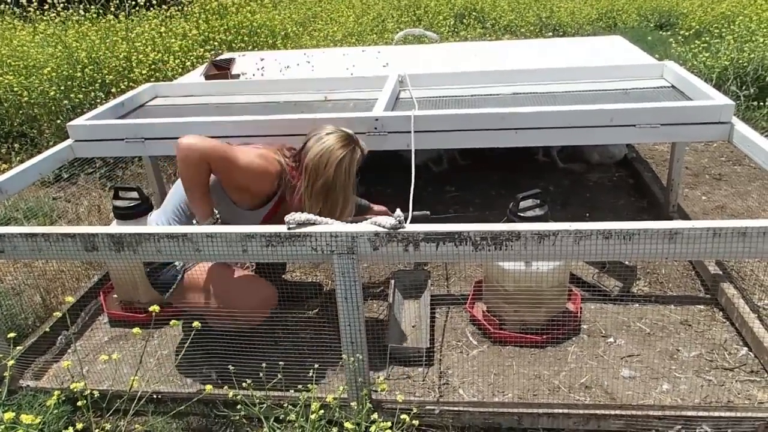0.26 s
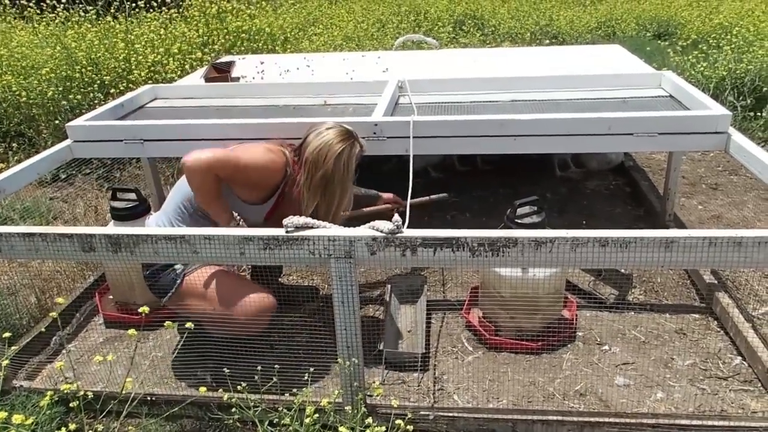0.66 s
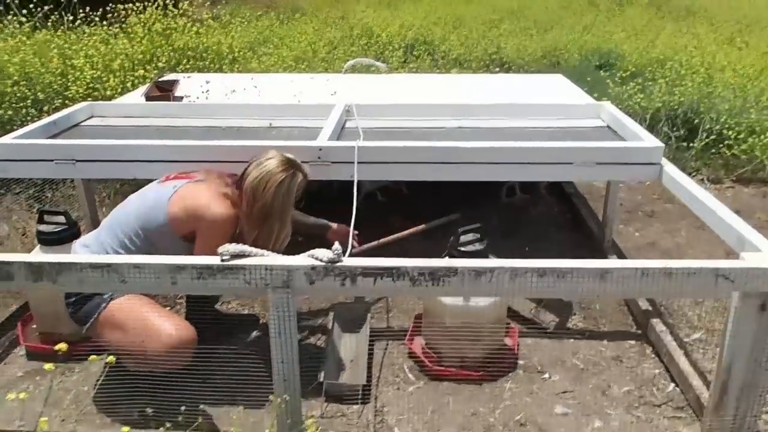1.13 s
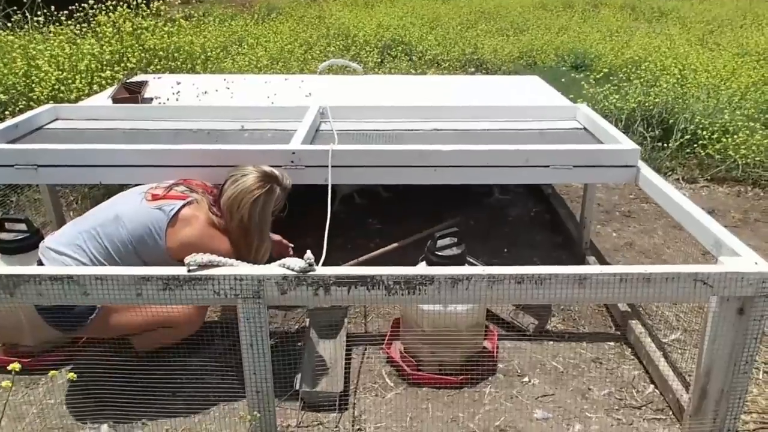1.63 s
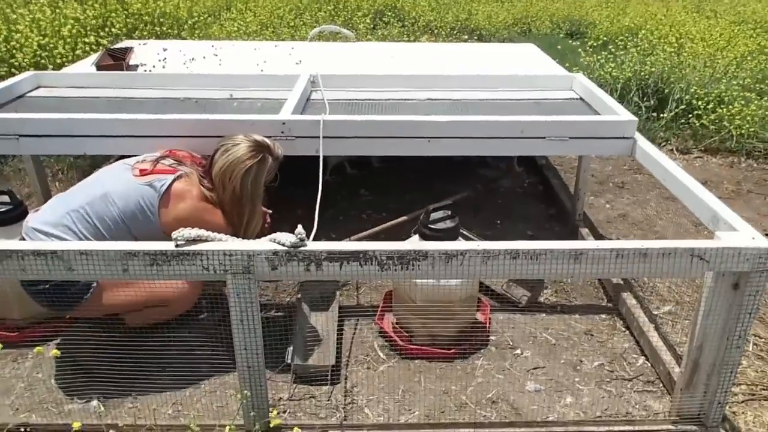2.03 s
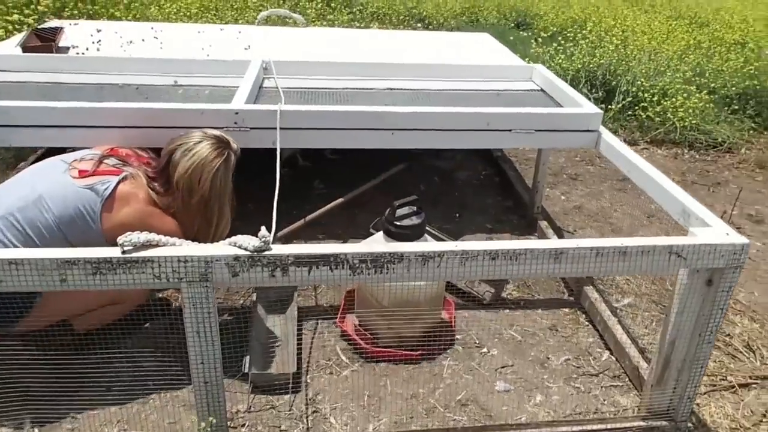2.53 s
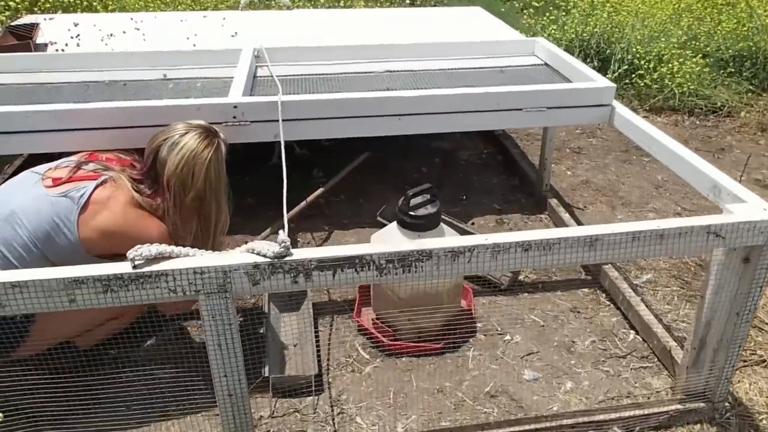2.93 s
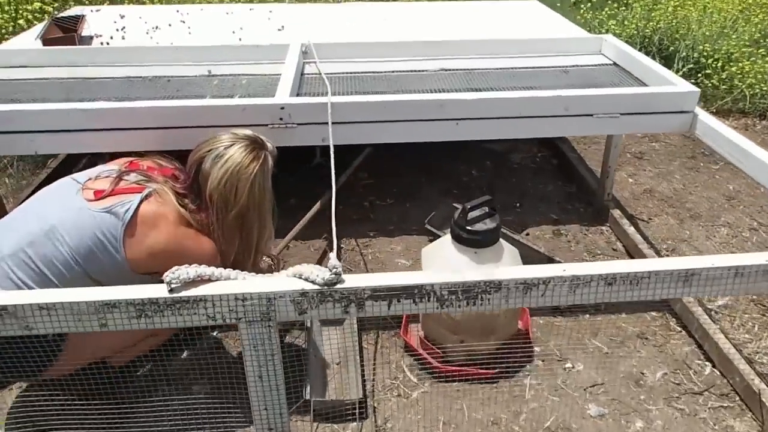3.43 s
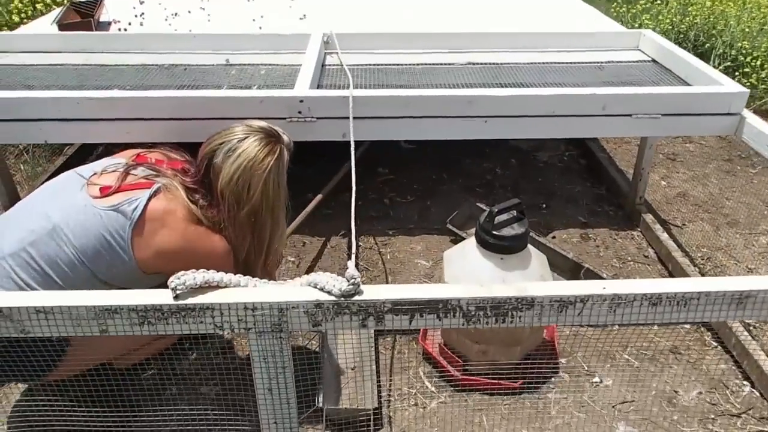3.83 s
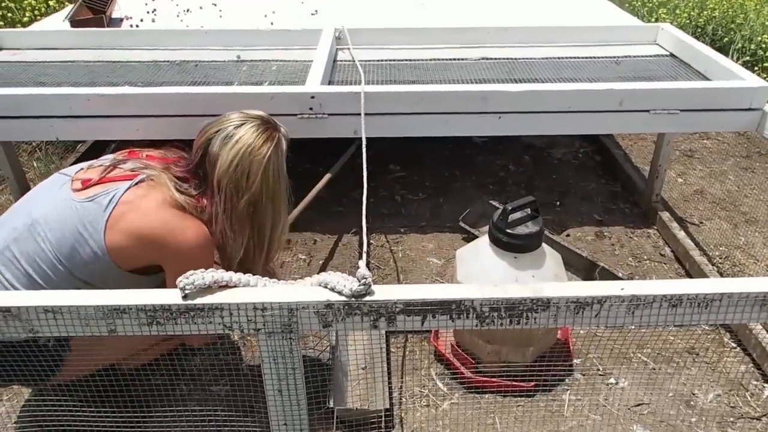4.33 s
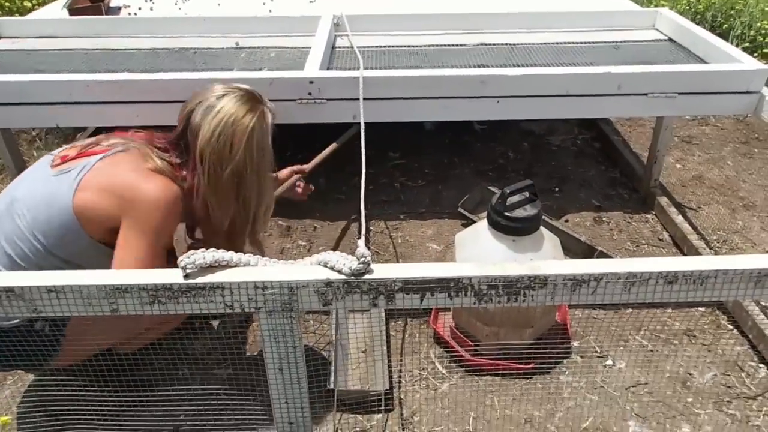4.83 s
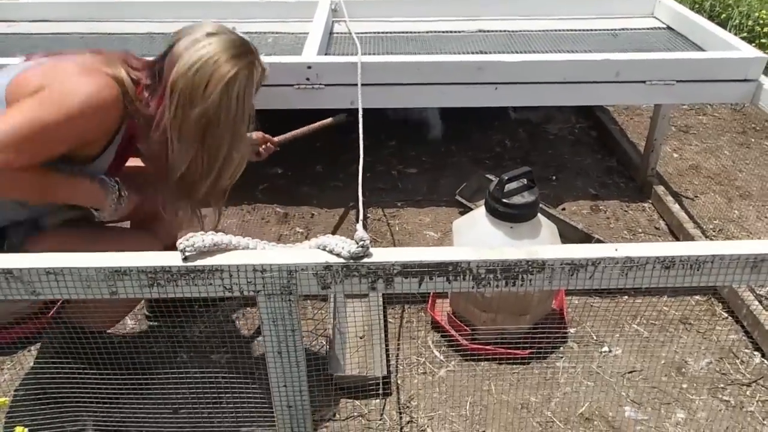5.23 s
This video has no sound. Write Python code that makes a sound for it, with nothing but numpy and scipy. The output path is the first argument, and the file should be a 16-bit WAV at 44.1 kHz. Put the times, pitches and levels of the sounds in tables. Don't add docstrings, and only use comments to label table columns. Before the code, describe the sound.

Young chickens peep and cluck faintly under a wire pen roof amid buffeting wind, then scuffle, slap the wood and squawk sharply near the end.

```python
import sys
import numpy as np
from scipy import signal
from scipy.fft import rfft, irfft, next_fast_len
from scipy.io import wavfile
from scipy.ndimage import map_coordinates

SR = 44100
rng = np.random.default_rng(int(sys.argv[2]) if len(sys.argv) > 2 else 0)


def gain_from_decibels(decibels):
    exponent = np.asarray(decibels, float) / 20
    return 10 ** exponent


def digitize_waveform(pressure):
    field = np.atleast_2d(pressure).T
    bounded = np.clip(field, -1, 1)
    quanta = np.round(bounded * 32767).astype(np.int16)
    wavfile.write(sys.argv[1], SR, quanta)


N = 241527

# time in seconds, level in dB.
WIND_STRENGTH = [(0.0, -31), (0.14, -31), (0.46, -40), (0.65, -31.5), (0.76, -34), (0.99, -37.5),
                 (1.37, -31.5), (1.93, -35), (2.18, -31), (2.3, -33.5), (3.08, -31.5), (3.46, -38),
                 (3.82, -38), (4.56, -38.5), (4.86, -29.5), (5.03, -37), (5.22, -38), (5.47, -30.5)]
# centre in seconds, peak in dB, frequency in Hz.
PUFFS_LEFT = [(0.055, -13, 152), (0.084, -6, 139), (0.216, -9.5, 140), (0.261, -12.5, 160),
              (0.682, -18, 130), (0.709, -10, 125), (1.21, -6, 142), (1.487, -11, 129), (1.514, -11, 168),
              (1.545, -15.5, 160), (1.654, -12, 151), (1.934, -14, 104), (2.012, -9.5, 163),
              (2.506, -11, 99), (2.923, -15, 119), (2.96, -12, 140), (3.057, -10, 137), (4.818, -13, 169),
              (4.862, -11, 150), (5.44, -14, 150)]
PUFFS_RIGHT = [(0.034, -12.5, 122), (0.088, -11, 139), (0.224, -5, 236), (0.251, -5.5, 160),
               (0.355, -11, 136), (0.691, -13, 106), (1.138, -15.5, 119), (1.192, -11.5, 130),
               (1.229, -13.5, 186), (1.376, -14, 111), (1.487, -8.5, 127), (1.525, -11, 154),
               (1.657, -5.5, 124), (2.01, -11.5, 142), (2.256, -10, 138), (3.859, -9.5, 126),
               (4.767, -9, 146), (4.84, -8, 151), (4.858, -11, 132)]
# frequency in Hz, level in dB.
RUMBLE_SPECTRUM = [(12, -43), (20, -17), (59, 2.5), (130, -1.5), (170, -10.5), (290, -120)]
FLUTTER_SPECTRUM = [(70, -51), (120, 2.5), (190, 2), (300, -11), (500, -22.5), (900, -39)]
# time in seconds, level in dB.
UNREST = [(0.0, -38.5), (0.17, -41.5), (0.65, -43.5), (1.86, -43), (2.39, -35.5), (2.56, -29),
          (2.71, -37.5), (2.85, -34.5), (3.15, -37), (3.41, -39.5), (4.16, -41), (4.46, -37.5), (5.18, -38),
          (5.32, -35), (5.47, -36)]
# start in seconds, length in seconds, level in dB.
SWISHES = [
    (2.83, 0.35, -42),
    (5.35, 0.22, -40),
]
# frequency in Hz, level in dB.
FLOCK_SPECTRUM = [(200, -40), (350, 4.5), (800, -0.5), (1100, -0.5), (1700, -3.5), (2150, -1.5), (3000, -4),
                  (4200, -12), (6000, -27)]
LITTER_SPECTRUM = [(2500, -21.5), (3800, 1.5), (6000, -2.5), (8000, -6.5), (16000, -39)]
AIR_SPECTRUM = [(5000, -12), (7500, 0.5), (15000, -1), (17000, -25)]
# start in seconds, length in seconds, litter level in dB, thump level in dB.
KICKS = [(0.054, 0.04, -37, -30.5), (0.286, 0.034, -32.5, -39), (1.343, 0.047, -43, -38.5),
         (2.333, 0.062, -34, -35), (2.405, 0.048, -23, -30), (2.36, .01, -30, -45),
         (2.466, 0.04, -28, -33.5), (2.498, .016, -28, -36), (2.585, .025, -28, -36),
         (2.655, 0.031, -23, -34), (2.692, 0.041, -18, -26), (2.737, 0.047, -30.5, -30.5),
         (3.857, 0.023, -25, -38), (4.393, .022, -29, -35), (4.497, 0.013, -37, -30.5),
         (4.764, 0.043, -28, -45), (5.075, 0.095, -26.5, -37), (5.165, .025, -32, -40),
         (5.186, .016, -28, -27), (5.2, 0.024, -22.5, -26.5), (5.227, 0.031, -29, -41)]
BEATS = [(2.901, 0.03, -28, -50), (2.959, 0.037, -24.5, -38), (3.002, 0.054, -31.5, -36),
         (3.619, 0.099, -32, -37.5), (4.29, 0.016, -32, -29), (4.515, 0.029, -34, -41),
         (4.664, 0.023, -28.5, -38), (4.835, 0.056, -34, -36), (4.895, 0.06, -31, -29),
         (4.948, 0.039, -33, -34), (5.305, 0.013, -29, -31), (5.314, 0.019, -18.5, -22.5),
         (5.374, 0.045, -24, -34), (5.429, 0.026, -27, -39)]
# start in seconds, peak in dB, knock relative to the peak in dB.
TICKS = [(0.382, -30, 3), (0.4658, -33, -1), (0.5185, -23, -16), (0.933, -21, -2.5), (1.0412, -21.5, -4),
         (1.1435, -26, -17), (2.1507, -16, -15), (2.614, -15, -20), (4.3344, -24, -10),
         (4.5516, -18.5, -11), (5.2027, -9, -14), (5.2094, -10, -13), (2.4161, -18, -15),
         (2.6969, -16, -20), (2.9683, -19, -12), (4.396, -25, -10), (4.667, -27, -8), (5.2396, -21, -15),
         (5.316, -12, -11), (5.32, -10, -12), (5.3778, -17, -11), (5.3833, -17, -15), (5.4362, -19, -15),
         (5.2574, -21, -13), (5.4563, -8, -23)]
# frequency in Hz, level in dB.
THUMP_SPECTRUM = [(120, -6), (430, 6.5), (700, -1.5), (1200, 1), (3500, -4), (5000, -19)]
FEATHER_SPECTRUM = [(4500, -21), (6500, -5.5), (10000, -3), (16000, -5)]
# start in seconds, length in seconds, middle pitch in Hz, peak in dB.
CLUCKS = [(.079, 0.026, 1336, -32), (.233, 0.022, 1055, -34), (.301, 0.018, 978, -34),
          (1.275, 0.022, 1070, -40), (1.338, 0.011, 1110, -31), (1.358, .015, 1110, -25.5),
          (1.739, 0.027, 1236, -33), (2.055, 0.028, 1150, -36), (2.333, 0.035, 1314, -33.5),
          (2.341, 0.022, 1025, -28), (2.562, 0.0144, 1200, -21.5), (2.953, 0.022, 1027, -37),
          (2.983, 0.046, 1042, -37.5), (3.156, 0.013, 1162, -29), (3.653, 0.015, 1470, -27),
          (4.96, 0.013, 1216, -32), (2.965, 0.071, 432, -37), (4.903, 0.024, 723, -28.5)]
# start in seconds, length in seconds, middle pitch in Hz, peak in dB.
PEEPS = [(.136, .046, 2355, -43), (.277, 0.017, 3020, -39), (.33, 0.026, 2020, -39), (.4, 0.065, 2195, -41),
         (.464, 0.029, 3370, -44), (.684, 0.071, 2134, -39), (.845, 0.09, 2070, -38.5),
         (1.365, 0.12, 2200, -35.5), (1.553, .032, 2550, -43.5), (1.74, .055, 2170, -37),
         (1.953, 0.044, 3680, -45), (3.596, 0.03, 2215, -35.5), (4.379, 0.027, 3120, -35),
         (4.55, 0.034, 1675, -37.5), (4.878, 0.023, 2300, -33.5), (5.171, 0.027, 1637, -28)]
# start in seconds, length in seconds, middle pitch in Hz, peak in dB.
QUERIES = [
    (.186, 0.12, 2439, -37),
    (3.128, 0.051, 2710, -35.5),
]
# start in seconds, length in seconds, middle pitch in Hz, peak in dB.
CHIRPS = [(.285, 0.037, 2267, -38), (.758, .03, 3350, -39), (.91, 0.034, 1560, -47),
          (2.552, 0.0138, 1800, -36), (1.625, 0.083, 2800, -45), (1.922, 0.0254, 1152, -35),
          (2.07, 0.074, 2200, -41), (3.165, 0.053, 2400, -35), (3.287, .051, 1790, -41),
          (2.785, 0.069, 2350, -37), (3.433, 0.028, 1133, -28.5), (3.722, 0.036, 1500, -40),
          (3.888, 0.065, 2400, -37), (4.401, 0.058, 2370, -37), (4.723, 0.04, 1786, -38),
          (1.775, .07, 2080, -35.5), (1.025, .028, 1090, -30)]
# start in seconds, length in seconds, middle pitch in Hz, peak in dB.
SWOOPS = [
    (.319, 0.045, 1060, -39),
    (.696, .044, 1058, -41.5),
    (1.058, 0.089, 2260, -41),
    (2.267, 0.03, 1210, -36),
    (3.267, 0.022, 966, -31.5),
    (3.602, 0.0406, 1172, -37),
    (4.126, 0.022, 1100, -33),
    (4.222, 0.049, 1065, -29.5),
    (4.427, 0.048, 1106, -34),
]
# start in seconds, length in seconds, middle pitch in Hz, peak in dB.
HOOKS = [
    (.935, 0.062, 2460, -34.5),
    (1.158, 0.059, 2460, -31),
    (1.952, 0.05, 2480, -31.5),
    (3.221, 0.047, 2450, -30),
    (3.388, .055, 2750, -35),
]
# start in seconds, length in seconds, start pitch in
# Hz, end pitch in Hz, peak in dB.
CROWD_STRANDS = [(.495, .02, 2900, 2700, -43), (.575, 0.033, 2740, 2450, -43.5),
                 (.61, 0.034, 2650, 2440, -40), (.645, .025, 2160, 2000, -39), (.74, .025, 4500, 3700, -44),
                 (.775, .035, 2600, 2500, -42), (.87, 0.059, 3470, 2600, -46), (.96, 0.041, 3800, 3000, -41),
                 (1.0, .02, 2500, 2480, -45), (1.03, .015, 2300, 2100, -40), (1.04, 0.023, 3220, 3000, -41),
                 (1.06, 0.026, 2750, 2510, -42), (1.09, .05, 2450, 2390, -48), (1.25, .018, 2200, 1850, -44),
                 (1.343, .025, 2190, 2170, -38), (1.585, .03, 2250, 1945, -38),
                 (1.625, .02, 2150, 2050, -40), (1.7, .025, 3260, 3150, -44), (1.785, .02, 2430, 2410, -38),
                 (1.975, 0.044, 3700, 2400, -41), (2.13, 0.045, 3730, 3650, -43),
                 (2.17, 0.081, 2250, 1950, -44), (2.225, 0.037, 3700, 3150, -41),
                 (2.315, .03, 3350, 2900, -39), (2.34, .03, 2600, 2390, -38.5),
                 (2.56, .015, 2430, 2340, -32), (3.065, 0.043, 3060, 3000, -40),
                 (3.23, .02, 2150, 1850, -35), (3.3, 0.037, 2550, 2200, -43), (3.365, .03, 2010, 2900, -38),
                 (3.395, .025, 3600, 3400, -39), (3.45, .012, 2150, 2050, -38),
                 (3.95, 0.037, 2100, 2040, -41), (3.9, .08, 2200, 1500, -43),
                 (4.09, .045, 2660, 1250, -34.5), (4.2, 0.024, 2640, 2340, -33.5),
                 (4.228, .022, 2410, 2040, -32), (4.51, 0.062, 2990, 2550, -44.5),
                 (.545, 0.036, 1240, 1100, -43), (0.708, .025, 1800, 1600, -43),
               (0.774, 0.068, 1650, 1350, -43), (.845, .02, 1050, 880, -43),
               (0.974, 0.034, 2060, 1500, -42), (1.152, 0.016, 1330, 1020, -32.5),
               (1.163, .022, 874, 833, -32), (1.177, .035, 1495, 1300, -43), (1.36, .015, 1650, 1550, -43),
               (1.487, .018, 1050, 1000, -37), (1.629, .02, 1070, 1030, -40.5),
               (1.735, .02, 1850, 1800, -39), (1.75, 0.018, 1500, 1450, -39), (1.79, .012, 800, 600, -33.5),
               (1.825, .015, 1300, 1200, -38), (1.96, .022, 1520, 1480, -41),
               (2.251, .015, 1080, 1000, -39), (2.334, 0.013, 680, 620, -31), (2.489, .02, 1980, 1950, -36),
               (2.53, .012, 1150, 1050, -34), (3.366, .03, 1720, 1450, -41.5),
               (3.465, .025, 1250, 1320, -33), (3.493, 0.032, 1840, 1450, -38.5),
               (3.56, 0.017, 1660, 1610, -44), (3.647, .012, 1900, 1750, -38), (3.89, .05, 1500, 1000, -43),
               (4.21, .04, 1900, 1400, -41), (4.011, 0.019, 1260, 1050, -44)]
# start in seconds, length in seconds, middle pitch in Hz, peak in dB.
YELPS = [(4.774, .011, 1633, -17.5), (4.797, 0.012, 1643, -16), (5.078, 0.027, 3640, -29),
         (5.08, 0.016, 2050, -30), (5.139, 0.0069, 1570, -24), (5.375, 0.02, 2820, -25),
         (5.391, 0.014, 2090, -16), (5.402, 0.016, 1960, -16), (5.39, 0.014, 1740, -18),
         (5.402, 0.023, 1372, -21), (5.41, 0.019, 1657, -18.5)]
# start in seconds,
# length in seconds, start pitch in Hz, end pitch in Hz, peak in dB.
YELP_STRANDS = [
    (4.779, .012, 1800, 2350, -21),
    (4.789, .013, 2400, 2100, -20),
    (4.8, .012, 2250, 1900, -27),
    (4.953, .016, 2350, 1250, -30),
    (5.088, .008, 3100, 2000, -25),
    (5.104, .009, 2100, 2250, -23),
    (5.124, .007, 2200, 2300, -24),
    (5.1, .008, 3200, 3250, -28),
]
# frequency in Hz, time to fall by 60 dB in seconds.
ROOF_DECAY = [(500, 0.12), (3000, 0.12), (10000, 0.08)]
# time in seconds, level in dB.
STALK_DRAG = [
    (2.520, -58),
    (2.522, -10.5),
    (2.543, -12.5),
    (2.56, -11.5),
    (2.566, -57),
    (2.59, -70),
]
# frequency in Hz, level in dB.
STALK_SPECTRUM = [(3240, -31), (5500, -31), (6720, -16), (8450, -11.5), (10800, 3), (14000, -7),
                  (15100, -9), (16000, -33)]
# start in seconds, peak in dB, knock frequency in Hz.
SLAPS = [
    (5.2035, -6, 380),
    (5.2105, -3, 430),
    (5.3185, -12, 400),
    (4.2955, -22, 900),
    (4.4995, -24, 800),
]
# time in seconds, pitch in Hz, peak in dB, third partial in dB.
SQUAWK = [
    (5.093, 1750, -40, -20),
    (5.097, 1640, -9.5, -27),
    (5.102, 1630, -6.5, -18),
    (5.107, 1648, -8, -22),
    (5.1105, 1670, -17, -18),
    (5.114, 1660, -6, -26),
    (5.128, 1673, -8, -34),
    (5.135, 1600, -6.5, -34),
    (5.14, 1560, -32, -30),
]
# frequency in Hz, gain in dB.
HOUSING = [(3600, 1.5), (4030, -6), (4300, 5.5), (4830, 13.5), (5300, 7), (6000, 0.5), (7000, -5.5),
           (15800, -11), (16100, -60)]
# frequency in Hz, left minus right in dB.
BALANCE = [(300, -1.5), (2400, -1.5), (4400, -2), (8100, -3.5), (15000, -6.5)]

PEEP_GLIDE, CLUCK_GLIDE, CHIRP_GLIDE = (1.015, 0.93), (1.029, 0.92), (1.17, 0.83)
SWOOP_GLIDE, QUERY_GLIDE = (1.24, 0.937), (0.85, 1.01)
YELP_GLIDE, HOOK_GLIDE = (1.01, 0.94), (1.02, 0.8)


def unit(x):
    return x / np.sqrt(np.mean(x ** 2) + 1e-20)


def along(points, hz):
    f, v = np.transpose(points)
    return np.interp(np.log(hz + 1), np.log(f + 1), v)


def curves(rows):
    s, *columns = np.transpose(rows)
    return [np.interp(np.arange(N) / SR, s, column) for column in columns]


def wobble(rate):
    return map_coordinates(rng.standard_normal(int(N * rate / SR) + 4), [np.arange(N) * rate / SR])


def coloured(x, points):
    m = next_fast_len(N + 8192)
    gain = gain_from_decibels(along(points, np.fft.rfftfreq(m, 1 / SR)))
    return irfft(rfft(x, m) * gain, m)[..., :N]


def rush(spectrum, alike):
    mid, side = coloured(rng.standard_normal((2, N)), spectrum)
    turn = np.arccos(np.clip(alike, -1, 1)) / 2
    left = np.cos(turn) * mid + np.sin(turn) * side
    right = np.cos(turn) * mid - np.sin(turn) * side
    return unit(np.array([left, right]))


def add(track, s, sound):
    part = track[max(round(s * SR), 0):][:len(sound)]
    part += sound[:len(part)]


def humps(rows):
    track = np.zeros(N)
    for s, length, gain in rows:
        u = np.arange(round(3 * length * SR)) / (length * SR)
        rise = np.minimum(u / 0.12, 1)
        add(track, s, gain * rise * 1.3 * np.exp(-(u / 0.7) ** 1.5))
    return track


def lumps(gusts, depth_db):
    return gain_from_decibels(3.4 * gusts + depth_db * np.array([wobble(18), wobble(18)]))


def wind():
    buffet_db, = curves(WIND_STRENGTH)
    t = np.arange(N) / SR
    stirred = np.zeros(N)
    for s, db, hz in PUFFS_LEFT + PUFFS_RIGHT:
        stirred += gain_from_decibels(db) * np.exp(-((t - s) / 0.27 * 2) ** 2)
    flutter_db = buffet_db - 3.5 + 5.5 * np.tanh(stirred / 1.4)
    gusts = np.minimum(wobble(12), 1.2)
    out = gain_from_decibels(buffet_db + 3) * unit(lumps(gusts, 2.54) * rush(RUMBLE_SPECTRUM, 0.58))
    out += gain_from_decibels(flutter_db - 0.5) * unit(lumps(gusts, 3.7) * rush(FLUTTER_SPECTRUM, 0.3))
    t = np.arange(-1500, 1500) / SR
    for port, puffs in zip(out, (PUFFS_LEFT, PUFFS_RIGHT)):
        turns = rng.uniform(0, 2 * np.pi, len(puffs))
        for (s, db, hz), turn in zip(puffs, turns):
            spin = 2 * np.pi * hz * t + turn
            swing = np.cos(spin) + 0.15 * np.cos(2 * spin) + 0.031 * np.cos(3 * spin)
            add(port, s + t[0], gain_from_decibels(db + 1.73) * np.exp(-(t * hz / 0.53) ** 2) * swing)
    return out


def shuffle():
    unrest_db = curves(UNREST)[0] + 42
    stir = wobble(14)
    litter_db = unrest_db - 47.5 + 1.4 * stir + 1.9 * wobble(250)
    flock_db = 0.78 * unrest_db - 44.5 + 1.1 * stir + 2.2 * wobble(30)
    air_db = 0.54 * unrest_db - 46 + 0.31 * stir
    swish = humps((s, length, gain_from_decibels(db)) for s, length, db in SWISHES)
    litter = gain_from_decibels(litter_db) * rush(LITTER_SPECTRUM, 0.9)
    flock = gain_from_decibels(flock_db) * rush(FLOCK_SPECTRUM, 0.89)
    air = (gain_from_decibels(air_db) + swish) * rush(AIR_SPECTRUM, 0.21)
    return litter + flock + air


def scuffs():
    s, length, litter_db, thump_db = np.transpose(KICKS + BEATS)
    feather_db = litter_db + np.repeat([-20.5, -13.5], [len(KICKS), len(BEATS)])
    litter = humps(zip(s, length, gain_from_decibels(litter_db)))
    thump = humps(zip(s, length, gain_from_decibels(thump_db)))
    feather = humps(zip(s, length, gain_from_decibels(feather_db)))

    when, tick_db, knock_db = np.transpose(TICKS)
    short = np.full(len(when), 0.004)
    feather += humps(zip(when, short, gain_from_decibels(tick_db - 16.5)))
    litter += humps(zip(when, short, gain_from_decibels(tick_db - 12.5)))
    thump += humps(zip(when, short, gain_from_decibels(tick_db + knock_db - 8.5)))

    grain = gain_from_decibels(2.3 * wobble(300) + 1.2 * wobble(110))
    out = 0.5 * litter * rush(LITTER_SPECTRUM, 0.93)
    out += thump * rush(THUMP_SPECTRUM, 1.0)
    out += 2.23 * feather * rush(FEATHER_SPECTRUM, 0.59)
    return grain * out


def calls(rows, round_off, rough_db, drift, rasp, second_db, third_db):
    out, tremor, waver, breath = np.zeros(N), wobble(70), wobble(90), wobble(900)
    for s, length, hz0, hz1, hz2, db in rows:
        u = np.linspace(-1, 1, round(length * SR))
        here = (round(s * SR) + np.arange(len(u))) % N
        pitch = hz1 + (hz2 - hz0) / 2 * u + ((hz0 + hz2) / 2 - hz1) * u ** 2
        phase = 2 * np.pi * np.cumsum(pitch * (1 + drift * waver[here])) / SR
        tone = np.sin(phase) + gain_from_decibels(second_db) * np.sin(2 * phase) + gain_from_decibels(third_db) * np.sin(3 * phase)
        shape = gain_from_decibels(db + rough_db * tremor[here]) * np.cos(u * np.pi / 2) ** round_off
        add(out, s, shape * (1 + rasp * breath[here]) * tone)
    return out


def glide(rows, shape):
    return [(s, length, hz * shape[0], hz, hz * shape[1], db) for s, length, hz, db in rows]


def strands(rows):
    return [(s, length, hz0, (hz0 + hz2) / 2, hz2, db) for s, length, hz0, hz2, db in rows]


def chatter(count):
    s, life, height, fall, size = rng.random((count, 5)).T
    hz = 1100 * 3.2 ** height
    start_hz = hz * (1.05 + 0.245 * fall)
    end_hz = hz * (0.96 - 0.16 * fall)
    return np.transpose([s * N / SR, 0.018 + 0.0348 * life, start_hz, hz, end_hz, -56 + 8 * size])


def flock_calls():
    rows = glide(PEEPS, PEEP_GLIDE) + glide(CLUCKS, CLUCK_GLIDE) + glide(CHIRPS, CHIRP_GLIDE)
    rows += glide(SWOOPS, SWOOP_GLIDE) + glide(QUERIES, QUERY_GLIDE) + glide(HOOKS, HOOK_GLIDE)
    rows += strands(CROWD_STRANDS)
    return calls(rows, round_off=0.35, rough_db=1.6, drift=0.011, rasp=0.46, second_db=-17, third_db=-27)


def roof(x):
    hz, t, z = signal.stft(rng.standard_normal((2, SR // 5)), SR, nperseg=256)
    decay = gain_from_decibels(-60 * t / along(ROOF_DECAY, hz)[:, None])
    mid, side = signal.istft(z * decay, SR, nperseg=256)[1]
    tail = np.array([mid + 0.27 * side, mid - 0.25 * side]) / np.linalg.norm(mid)
    return signal.fftconvolve(x[None], tail, axes=1)[:, :N]


def stalk():
    drag = gain_from_decibels(curves(STALK_DRAG)[0] + 1.9 * wobble(500))
    return drag * rush(STALK_SPECTRUM, 1.0) * gain_from_decibels([[-3], [2]])


def slaps():
    out, t = np.zeros(N), np.arange(SR // 40) / SR
    for s, db, hz in SLAPS:
        crack = np.exp(-t / 0.0009) * np.sin(2 * np.pi * 4300 * t) * 0.4
        knock = gain_from_decibels(-9) * np.exp(-t / 0.005) * np.sin(2 * np.pi * hz * t)
        add(out, s, gain_from_decibels(db) * (crack + knock))
    return out


def yelps():
    rows = glide(YELPS, YELP_GLIDE) + strands(YELP_STRANDS)
    return calls(rows, round_off=0.8, rough_db=1, drift=0.008, rasp=0.32, second_db=-32, third_db=-27)


def squawk():
    hz, db, third_db = curves(SQUAWK)
    t = np.arange(N) / SR
    phase = 2 * np.pi * np.cumsum(hz * (1 + 0.00394 * wobble(150))) / SR
    hoarse = gain_from_decibels(third_db) * wobble(1200)
    tone = (1 + 1.6 * hoarse) * np.sin(phase) + gain_from_decibels(-28) * np.sin(2 * phase)
    tone += (gain_from_decibels(third_db) + 0.4 * hoarse) * np.sin(3 * phase)
    sounding = (t > SQUAWK[0][0]) & (t < SQUAWK[-1][0])
    return gain_from_decibels(db + 0.6 * wobble(200)) * tone * sounding


def scene():
    peeps = flock_calls()
    far = calls(chatter(count=210), round_off=0.7, rough_db=2, drift=0.01, rasp=0.4,
                second_db=-20, third_db=-30)
    near = yelps() + squawk()
    echo = gain_from_decibels(-11) * roof(peeps + 2.4 * far) + gain_from_decibels(-15.5) * roof(near)
    birds = peeps + far + near + echo
    return wind() + shuffle() + scuffs() + birds + stalk() + slaps()


def top_cut(x):
    return signal.sosfilt(signal.butter(12, 16460, fs=SR, output="sos"), x)


def record(dry):
    heard = coloured(dry, HOUSING)
    left = coloured(heard[0], [(hz, db / 2) for hz, db in BALANCE])
    right = coloured(heard[1], [(hz, -db / 2) for hz, db in BALANCE])
    pair = np.array([left, right])
    ceiling = 0.97
    pair = pair / (1 + np.abs(pair / ceiling) ** 4) ** 0.25
    return top_cut(pair)


dry = scene()
out = record(dry)
digitize_waveform(out)
```